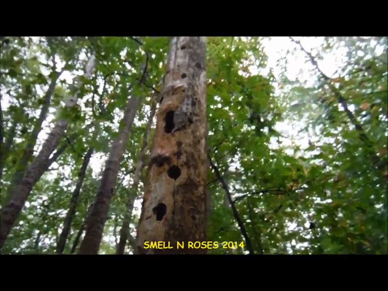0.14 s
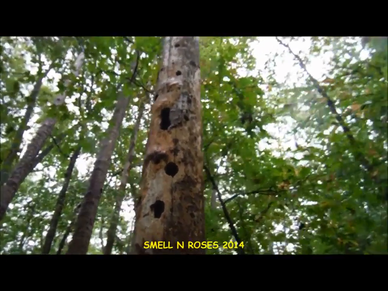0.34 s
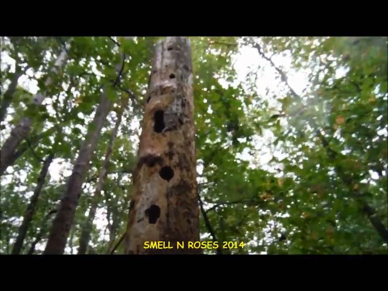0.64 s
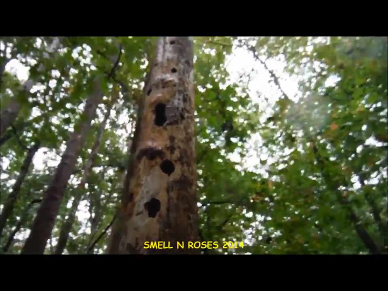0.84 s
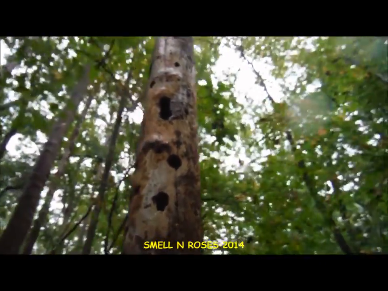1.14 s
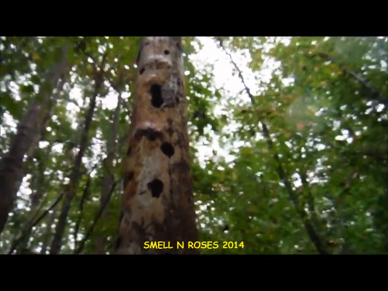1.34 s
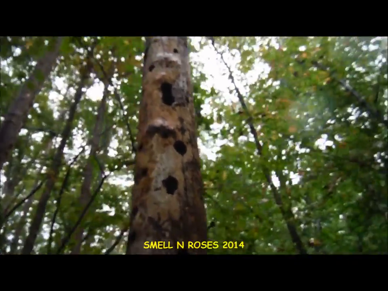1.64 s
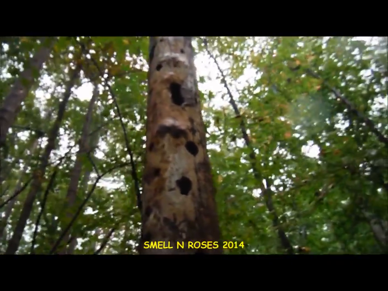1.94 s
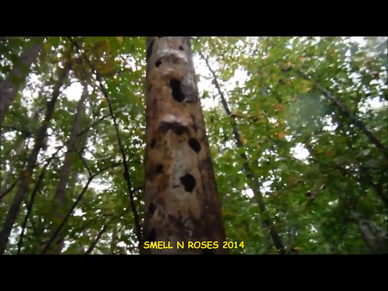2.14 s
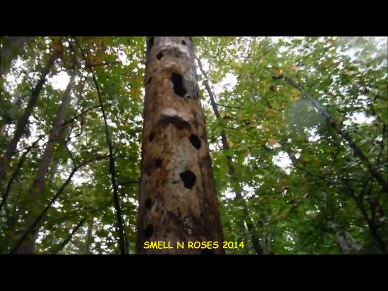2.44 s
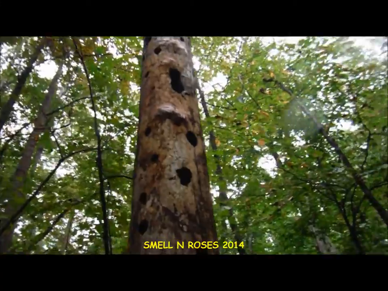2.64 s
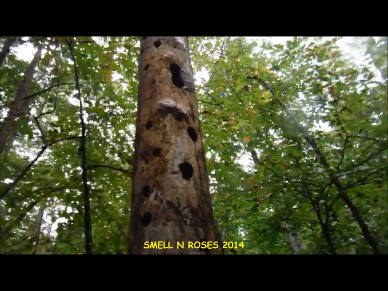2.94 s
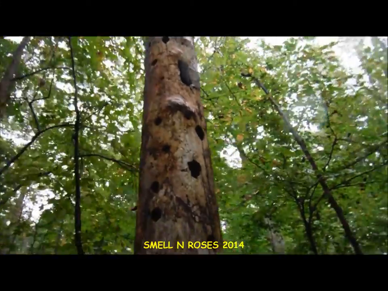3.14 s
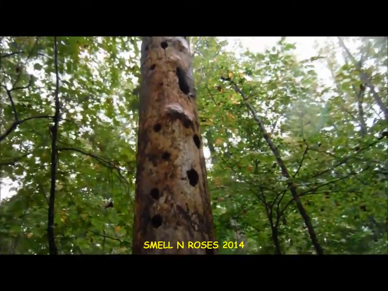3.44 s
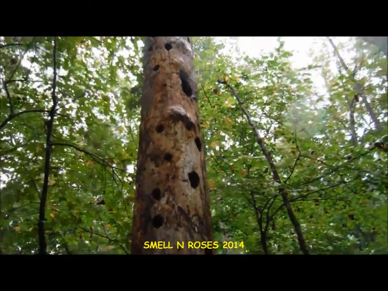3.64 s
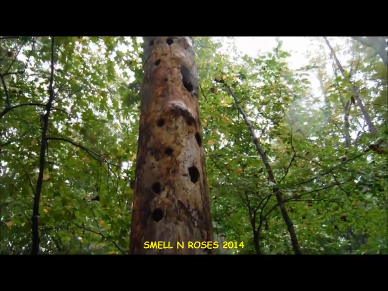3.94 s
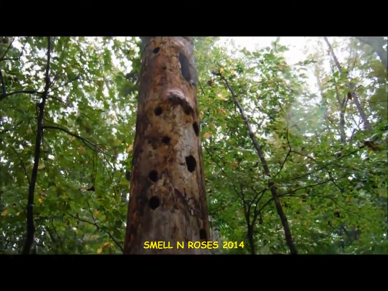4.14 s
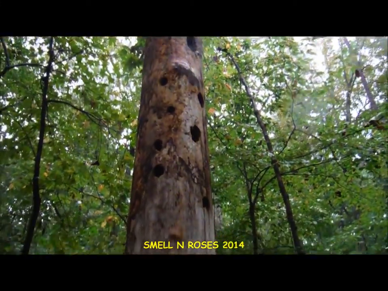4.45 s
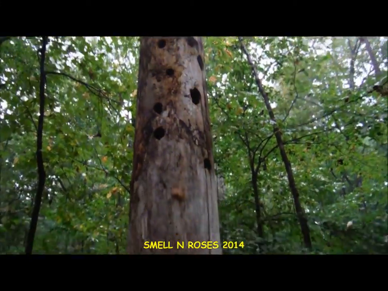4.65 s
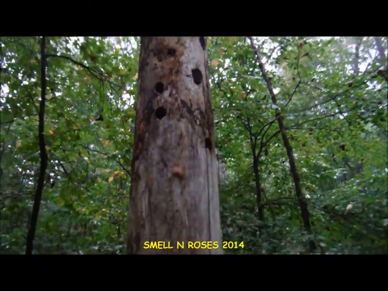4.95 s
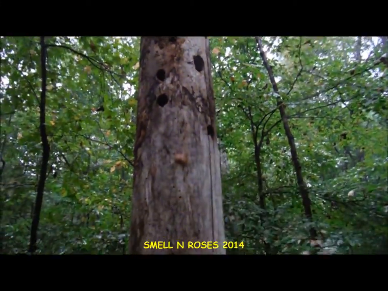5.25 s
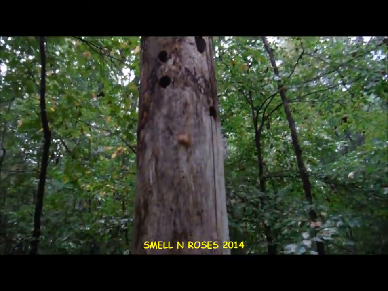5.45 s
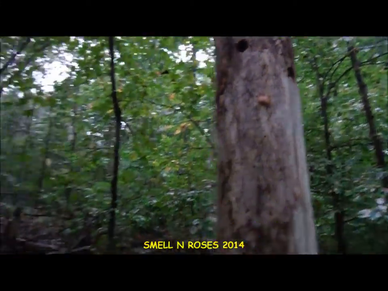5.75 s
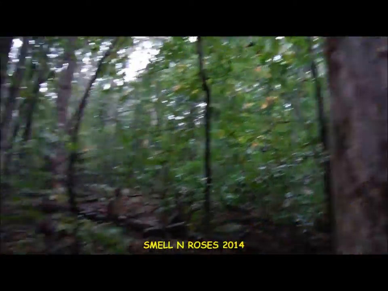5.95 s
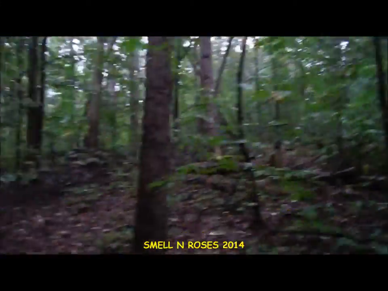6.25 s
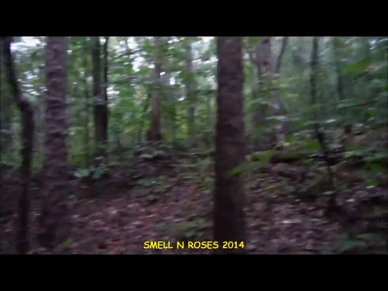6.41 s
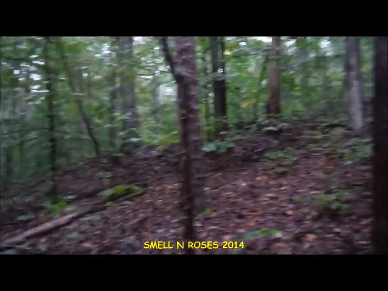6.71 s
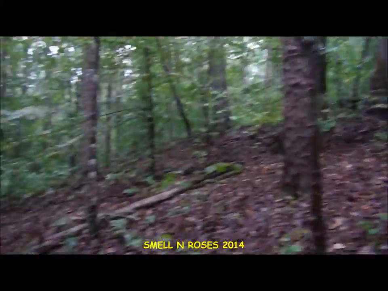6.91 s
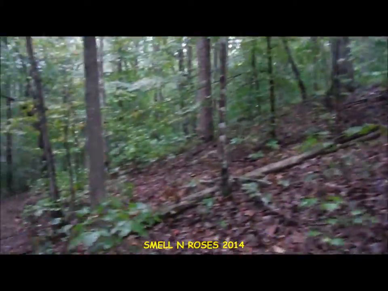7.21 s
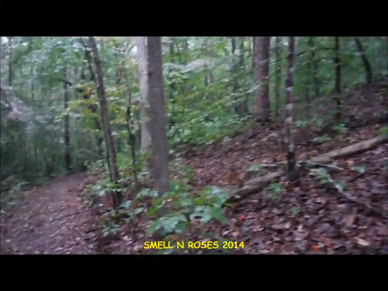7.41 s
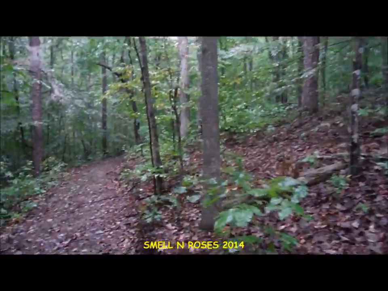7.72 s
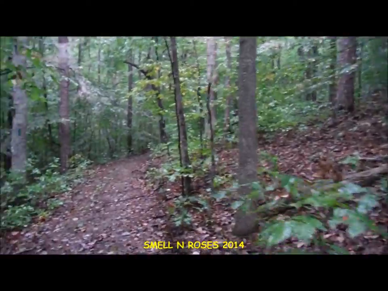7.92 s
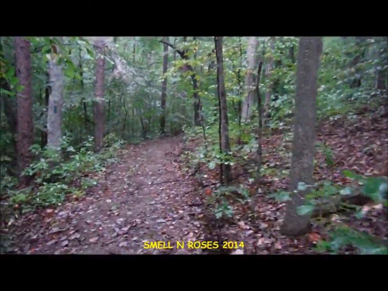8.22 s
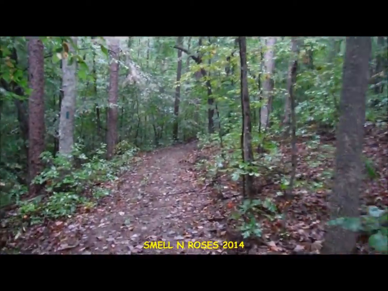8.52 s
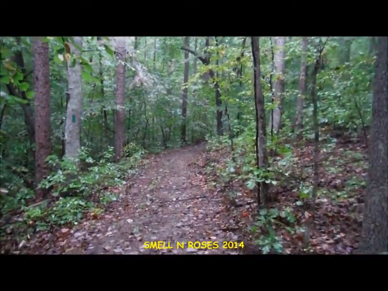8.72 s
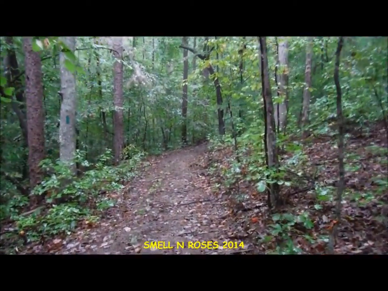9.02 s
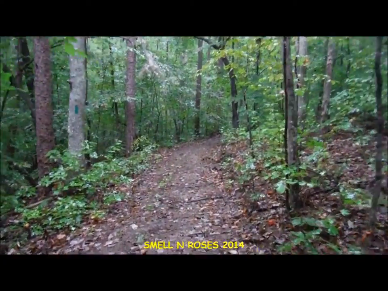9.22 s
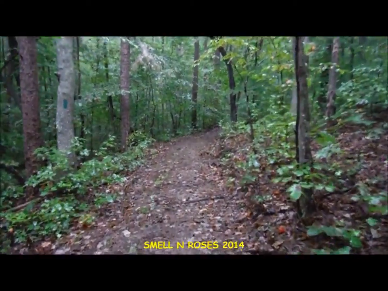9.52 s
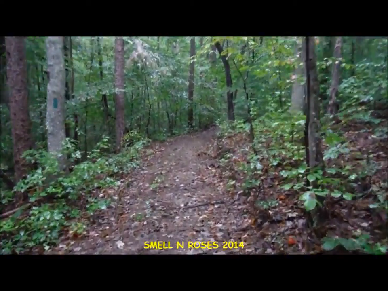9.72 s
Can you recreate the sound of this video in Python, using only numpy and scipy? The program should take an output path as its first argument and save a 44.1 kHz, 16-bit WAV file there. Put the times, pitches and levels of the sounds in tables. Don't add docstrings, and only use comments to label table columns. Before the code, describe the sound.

Even forest rainfall with crisp nearby drips on leaves, small splashes, hollow knocks and occasional sharp smacks on the camera's body.

```python
import sys
import numpy as np
from scipy import signal
from scipy.fft import rfft, irfft
from scipy.io import wavfile

SR = 44100
rng = np.random.default_rng(int(sys.argv[2]) if len(sys.argv) > 2 else 0)


def wav_record(signal):
    frames = np.transpose(np.atleast_2d(signal))
    bounded = np.clip(frames, -1, 1)
    quanta = np.round(bounded * 32767).astype(np.int16)
    wavfile.write(sys.argv[1], SR, quanta)


def convert_level_to_amplitude(level_db):
    exponent = np.asarray(level_db, float) / 20
    return 10 ** exponent


N = 435266

# start_s, hiss_db, patter_db (above the hiss)
SHOWER = [
    (0.0, -21, -9),
    (3.19, -21.5, -8.5),
    (4.09, -21.5, -8),
    (4.56, -21.5, -8),
    (7.17, -21.5, -9),
    (8.16, -21.5, -7),
    (8.66, -21.5, -7.5),
    (9.32, -21.5, -6.5),
    (9.87, -21, -11.5),
]
# freq_hz, level_db
COLOUR = [(15, -42), (25, -12), (118, -14), (1340, -2.5), (1840, -3), (2220, -1.5), (2750, -9.5),
          (3690, -1.5), (4220, -5.5), (5080, -1), (6300, -4.5), (8010, -4), (9400, -17.5), (14800, -38)]
# centre_hz, width_hz, gain_db
PORT = [
    (5030, 520, 1.45),
    (30.8, 13, 5.5),
    (95, 91, -3),
    (10450, 1100, 1.5),
    (15300, 1500, 1.5),
]
# start_s, peak_db, ring_hz
KNOCKS = [(.027, -13, 1980), (.228, -12, 1580), (.609, -5, 1760), (1.0505, -15, 1090), (1.0745, -12, 1420),
          (1.818, -8, 1600), (1.8502, -13, 1410), (2.0328, -15, 1280), (2.5698, -12, 1570),
          (3.8557, -14, 1850), (4.1427, -15, 1660), (4.2166, -15, 2150), (4.7124, -13, 2350),
          (5.2002, -13, 2150), (5.6506, -8.5, 2200), (5.7888, -11, 1680), (6.0262, -15, 2170),
          (6.3004, -15, 2240), (6.3385, -14, 1560), (6.5953, -15, 1780), (6.9205, -12, 1530),
          (7.1564, -10, 1810), (7.4975, -15, 1960), (8.3446, -16, 1570), (8.4561, -7, 1760),
          (8.6801, -11, 1890), (9.3535, -11, 2330), (9.4069, -11, 1810), (9.7819, -8, 1420)]
# start_s, peak_db, ring_hz, t60_s
SLAPS = [(0.229, -13, 2250, 0.0076), (.5406, 0, 2050, .018), (0.5395, -2, 2770, .012),
         (.5396, -3, 3520, .008), (0.6068, -9, 1300, .006), (.6068, -13, 3920, .004),
         (1.0746, -9, 7900, .005), (1.817, -5, 2400, .007), (1.817, -9, 7000, .004),
         (2.5693, -7.5, 3800, .004), (1.0765, -12, 5200, .012), (3.8558, 1, 5300, .009),
         (3.8556, -4, 3200, .007), (8.7593, -3, 3800, 0.0046), (.5404, 3, 1545, .022),
         (.5398, -9, 6900, .012), (.5398, -7, 9700, .011), (.5397, -8, 10800, .009),
         (3.8559, -7, 4200, .007), (8.7593, -7, 6800, .005), (6.6973, -9, 8600, .005),
         (3.8557, -10, 10500, .006), (1.8168, -2, 3750, .007), (.228, -10, 1560, .014),
         (8.0911, -4, 7900, .006), (8.4565, -11, 1400, .012)]
# start_s, peak_db, ring_hz, spray_db (re peak)
SPLASHES = [(.2279, -3, 3750, -26), (.5395, 6.5, 5800, -8), (1.0745, -3, 5770, -13),
            (1.3547, -6, 6570, -14), (1.8168, 3.5, 3100, -26), (2.3671, -4, 4720, -19),
            (2.57, -3, 6100, -15), (3.34, -11, 6590, -17), (3.8558, 4, 7500, -21), (4.1417, -4, 6420, -22),
            (4.5241, -5, 5900, -20), (4.5651, -7.5, 7820, -18), (6.3824, -1, 4780, -23),
            (6.3971, -7, 7360, -23), (6.5958, -7, 6550, -27), (6.6357, -2, 5510, -27),
            (6.6444, -5, 7540, -22), (6.6973, -7, 6900, -13), (6.8203, -7, 7900, -24),
            (6.9697, -2.5, 7650, -20), (7.249, -1, 5160, -27), (7.8094, -6, 7880, -24),
            (8.0914, 1, 4800, -26), (8.1153, -8, 8400, -24), (8.4047, -6, 3700, -26),
            (8.4567, -1.5, 5620, -29), (8.5552, -5, 4760, -26), (8.6956, -2, 6370, -24),
            (9.3985, -6, 6700, -22), (9.6594, -6, 6680, -29)]
# start_s, peak_db, ring_hz
TAPS = [(.6073, -3, 2840), (.7043, -9, 7050), (2.6138, -7, 5560), (2.803, -5, 5400), (2.815, -8, 4930),
        (3.582, -8, 5000), (3.8981, -7, 7410), (3.9083, -4, 5190), (4.2746, -1, 5810), (5.2963, -7, 5080),
        (5.4857, -7, 4840), (6.0081, -1, 4850), (6.138, -2, 4950), (6.4965, -3.5, 6500), (6.5836, -6, 5340),
        (7.3555, -4, 5970), (7.8275, -7, 5060), (7.9088, -7, 4890), (8.2151, -4.5, 5380),
        (8.3065, -7, 6910), (8.5651, -5, 4180), (8.6376, -7, 5580), (8.6769, -6, 5660), (8.7593, 1, 4700),
        (9.0458, -1.5, 5190), (9.1237, -7, 4440), (9.1745, -5, 6630), (9.354, -7, 3640), (9.4077, -3, 5120),
        (9.7596, -6, 6930)]
SPLIT_MOMENTS = [.46, 1.691, 2.387, 2.48, 2.526, 2.874, 2.99, 3.826, 4.082, 4.477, 5.057, 5.196, 5.986,
                 6.218, 6.613, 7.634]
# start_s, peak_db, thump_hz, t60_s
THUMPS = [
    (0.541, -8, 500, 0.016),
    (0.5405, -16, 260, .03),
    (0.606, -19, 184, .04),
    (1.076, -13, 250, 0.05),
    (6.697, -12, 550, .012),
    (6.697, -19, 260, .03),
    (8.679, -22, 135, 0.045),
    (8.859, -19, 447, 0.024),
    (9.759, -15.5, 600, .015),
    (9.762, -21, 170, 0.05),
]
# start_s, depth_db
DUCKS = [(.541, 1), (1.076, 2), (1.818, 1), (2.571, 2.5), (3.857, 5), (4.275, 1.5), (6.384, .5), (6.698, 3),
         (6.971, 3.5), (8.092, 2.5), (8.458, 2.5), (8.696, 1), (8.76, .7), (9.41, 1.5), (9.761, 1.5)]

LONGER_PER_DB = .25
KNOCK_T60_S, TICK_T60_S = .0155, .0066
TAP_SPRAY_DB = -36
FAINT_TAPS, FAINT_DB, FAINT_SPREAD_DB = 50, -10.5, 1.6
FAINT_LOW_HZ, FAINT_HIGH_HZ = 4700, 7400
FAINT_LATE = .65
WHINE_HZ, WHINE_DB, FIELD_HZ, BEAT_HZ = 15734.3, -61, 59.94, 13.0
SPLIT_LOW_HZ, SPLIT_HIGH_HZ, SPLIT_WIDTH_HZ = 4300, 14000, 1600
CUTOFF_HZ = 15770


def rms_one(x):
    return x / np.sqrt(np.mean(x ** 2) + 1e-20)


def drift(rate):
    r = np.exp(-2 * np.pi * rate / SR)
    slow = signal.lfilter([1], [1, -2 * r, r * r], rng.standard_normal(N + SR))
    return rms_one(slow[SR:])


def coloured(x):
    size = 2 ** 14
    hz, level_db = np.transpose(COLOUR)
    grid = np.arange(size // 2 + 1) * SR / size + 1
    shape_db = np.interp(np.log(grid), np.log(hz), level_db)
    shape_db += sum(db / (1 + (2 * (grid - centre) / width) ** 2) for centre, width, db in PORT)
    cepstrum = irfft(np.log(convert_level_to_amplitude(shape_db)))
    cepstrum[1:size // 2] *= 2
    cepstrum[size // 2 + 1:] = 0
    response = irfft(np.exp(rfft(cepstrum)))
    return rms_one(signal.fftconvolve(x, response)[:N])


def patter(per_s, spread_db, cycles, low_hz, high_hz, tick):
    sizes = convert_level_to_amplitude(spread_db * np.minimum(rng.exponential(1, N), 3)) * rng.choice([-1, 1], N)
    falls = rng.random(N) < per_s * convert_level_to_amplitude(3 * drift(8)) / SR
    clicks = sizes * falls + 1e-18
    leaf = rng.integers(0, 16, N)
    rings = 0
    for k, hz in enumerate(np.geomspace(low_hz, min(high_hz, .45 * SR), 16)):
        r = convert_level_to_amplitude(-60 * hz / (cycles * SR))
        w = 2 * np.pi * hz / SR
        resonator = [1 - r * r, 0, r * r - 1], [1, -2 * r * np.cos(w), r * r]
        rings = rings + signal.lfilter(*resonator, clicks * (leaf == k))
    return tick * rms_one(clicks) + rms_one(rings)


def shower():
    s, hiss_db, patter_db = np.transpose(SHOWER)
    t = np.arange(N) / SR
    far = rng.standard_normal(N) * convert_level_to_amplitude(0.43 * drift(16))
    near = rms_one(patter(per_s=900, spread_db=4.0, cycles=9.2, low_hz=903, high_hz=14100, tick=0.79))
    rain = far + convert_level_to_amplitude(np.interp(t, s, patter_db)) * near
    return convert_level_to_amplitude(np.interp(t, s, hiss_db)) * coloured(rain)


def whine():
    t = np.arange(N) / SR
    wobble = 1 + .2 * np.cos(2 * np.pi * FIELD_HZ * t) + .15 * np.cos(4 * np.pi * FIELD_HZ * t)
    beat = 1 + .6 * np.cos(2 * np.pi * BEAT_HZ * t)
    return np.sqrt(2) * convert_level_to_amplitude(WHINE_DB) * wobble * beat * np.sin(2 * np.pi * WHINE_HZ * t)


def fading(t, t60):
    return convert_level_to_amplitude(-60 * (t / np.maximum(.66 * t60, 1e-3)) ** 1.6)


def damped(t, hz, t60):
    return np.sin(2 * np.pi * hz * t) * fading(t, t60)


def ring_time(t60, peak_db):
    return t60 * convert_level_to_amplitude(LONGER_PER_DB * peak_db)


def add(track, times, sounds):
    for s, sound in zip(times, sounds):
        i = round(s * SR)
        track[i:i + len(sound)] += sound[:N - i]


def struck(s, peak_db, hz, t60, partner, spread_db, rise_s, extra=0):
    t = np.arange(2400) / SR
    ring = damped(t, hz, t60)
    jitters = rng.uniform(.7, 1.3, (len(s), 4)).T[:, :, None]
    for step, jitter in zip([-2, -1, 1, 2], jitters):
        near_hz = hz * convert_level_to_amplitude(step * spread_db * jitter)
        heard = 1 / (1 + (near_hz / 8600) ** 12)
        ring = ring + partner ** abs(step) * heard * damped(t, near_hz, 0.81 * t60)
    ring = ring * (1 - np.exp(-(t / rise_s) ** 2))
    ring = ring / np.abs(ring).max(axis=1, keepdims=True)
    track = np.zeros(N)
    add(track, s[:, 0] - rise_s / 2, convert_level_to_amplitude(peak_db) * (ring + extra))
    return track


def knocks():
    timed = [(*knock, ring_time(KNOCK_T60_S, knock[1])) for knock in KNOCKS]
    return struck(*np.transpose(timed + SLAPS)[:, :, None], partner=.45, spread_db=1.2, rise_s=.0004)


def faint_taps():
    when, pitch, size = rng.random((FAINT_TAPS, 3)).T
    s = N / SR * when ** FAINT_LATE
    peak_db = FAINT_DB + 2 * FAINT_SPREAD_DB * (size - .5)
    hz = FAINT_LOW_HZ * (FAINT_HIGH_HZ / FAINT_LOW_HZ) ** (pitch ** 2)
    return list(zip(s, peak_db, hz))


def close_drops():
    taps = [(*tap, TAP_SPRAY_DB) for tap in TAPS + faint_taps()]
    s, peak_db, hz, spray_db = np.transpose(SPLASHES + taps)[:, :, None]
    t60 = ring_time(TICK_T60_S, peak_db)
    splash = rng.standard_normal((len(s), 2400)) * fading(np.arange(2400) / SR, t60)
    spray = signal.sosfilt(signal.butter(3, 11000, fs=SR, output="sos"), splash)
    spray = signal.sosfilt(signal.butter(2, 8000, "high", fs=SR, output="sos"), spray)
    return struck(s, peak_db - 1.1, hz, .82 * t60, partner=0.48, spread_db=1.5, rise_s=.00015,
                  extra=convert_level_to_amplitude(spray_db + 8.5) * spray)


def split_bands(x):
    out, window = x.copy(), np.hanning(2048)
    lows = rng.uniform(SPLIT_LOW_HZ, SPLIT_HIGH_HZ, (len(SPLIT_MOMENTS), 2)).T.ravel()
    for s, low_hz in zip(SPLIT_MOMENTS * 2, lows):
        i = round(s * SR) - len(window) // 2
        span = slice(i, i + len(window))
        later = slice(i + SR, i + SR + len(window))
        band = signal.butter(4, [low_hz, low_hz + SPLIT_WIDTH_HZ], "band", fs=SR, output="sos")
        here, elsewhere = signal.sosfiltfilt(band, [x[0, span], x[0, later]])
        opposed = np.sqrt(.5) * elsewhere * [[1], [-1]]
        out[:, span] += window * (opposed - (1 - np.sqrt(.5)) * here)
    return out


def thumps():
    push = struck(*np.transpose(THUMPS)[:, :, None], partner=.6, spread_db=2.6, rise_s=0.00052)
    return signal.sosfilt(signal.butter(2, 120, "high", fs=SR, output="sos"), push)


def scene():
    return np.tile(shower() + knocks() + close_drops() + thumps(), (2, 1))


def gain_control(x, release_db_s, attack_s):
    steps_db = np.zeros(N)
    for s, depth_db in DUCKS:
        steps_db[round(s * SR)] = max(depth_db, 0)
    ramp = release_db_s * np.arange(N) / SR
    held_db = np.maximum.accumulate(steps_db + ramp) - ramp
    r = np.exp(-1 / (attack_s * SR))
    return x * convert_level_to_amplitude(-signal.lfilter([1 - r], [1, -r], held_db))


def low_pass(x):
    return signal.sosfilt(signal.butter(12, 16880, fs=SR, output="sos"), x)


def record(dry):
    x = gain_control(dry, release_db_s=32, attack_s=.005)
    x = np.clip(x, -1.02, 1.02)
    x = signal.sosfilt(signal.ellip(10, .5, 55, CUTOFF_HZ, fs=SR, output="sos"), x + whine())
    mix = split_bands(x)
    return low_pass(mix)


dry = scene()
out = record(dry)
wav_record(out)
```